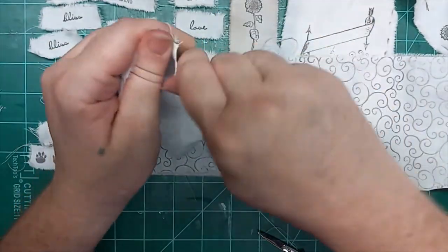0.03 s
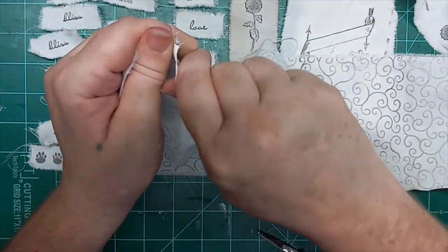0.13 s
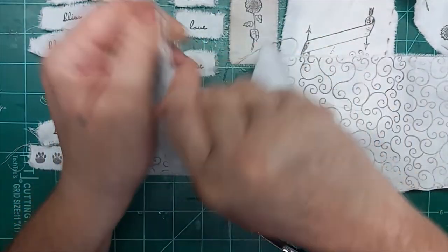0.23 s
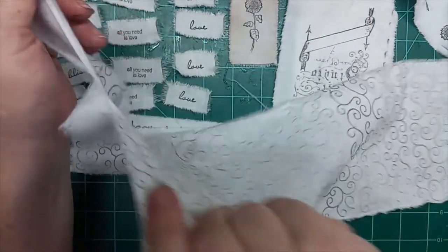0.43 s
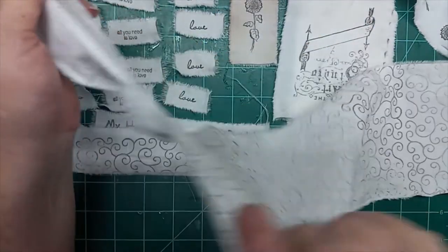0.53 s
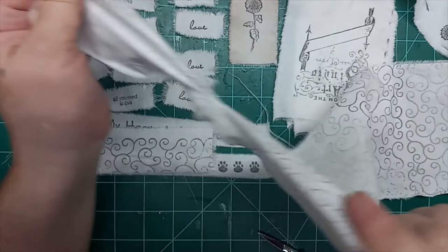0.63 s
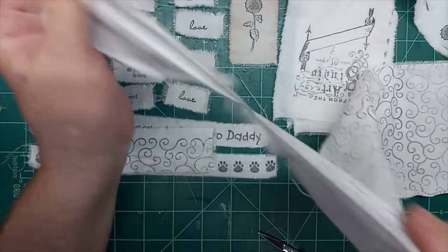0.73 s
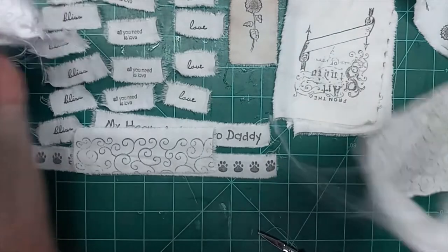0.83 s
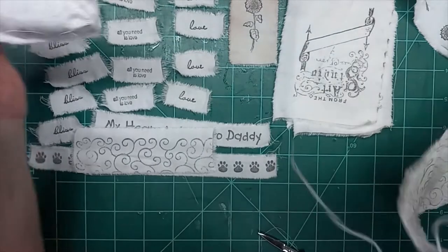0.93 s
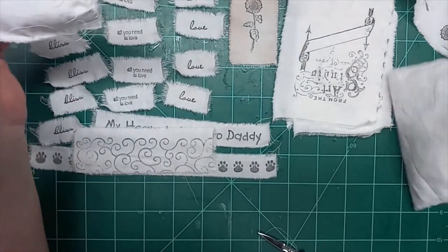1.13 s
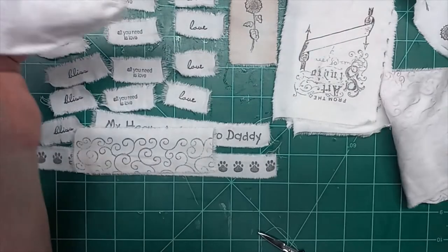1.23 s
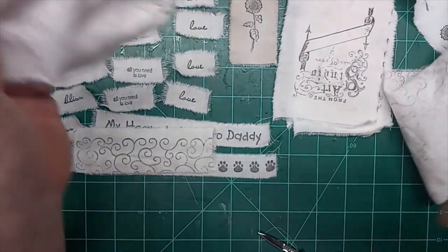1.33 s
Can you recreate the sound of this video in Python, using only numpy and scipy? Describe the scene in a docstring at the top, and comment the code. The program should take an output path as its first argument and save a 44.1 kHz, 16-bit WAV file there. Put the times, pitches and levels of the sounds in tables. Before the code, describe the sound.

Cloth is torn by hand, close up in a small quiet room. After a faint rustle of fingers, a long rip runs from about 0.2 to 0.6 seconds, bright and fast at first, then slower and lower. A short second rip comes at 0.7 seconds. The loose end swishes and cracks once around 0.8 seconds, and very faint finger brushes follow after 1 second.

```python
"""Two hands tear a strip of cotton over a cutting table in a small quiet room, close to the microphone.
Fingers grip the cloth; from 0.2 s threads snap one after another, fast and bright at first,
then slower while the freed cloth drums lower. At 0.73 s a short second pull parts the strip.
The loose end swishes through the air and cracks once; faint brushes of the fingers follow."""
import sys
import numpy as np
from scipy import signal
from scipy.fft import rfft, irfft, next_fast_len
from scipy.io import wavfile
from scipy.ndimage import uniform_filter1d, map_coordinates

SR = 44100
rng = np.random.default_rng(int(sys.argv[2]) if len(sys.argv) > 2 else 0)


def materialize(psi):
    """Save the field psi as 16-bit PCM at rate SR to the path in sys.argv[1].

    A 1-D psi becomes a single channel; in a 2-D psi each row is a channel.
    """
    bounded = np.clip(np.atleast_2d(psi).T, -1, 1)
    quanta = np.round(bounded * 32767).astype(np.int16)
    wavfile.write(sys.argv[1], SR, quanta)


N = 61739
T = np.arange(N) / SR


def amp(db):
    """Decibels to gain."""
    return 10 ** (np.asarray(db) / 20)


def unit_rms(x):
    """Scales to rms 1."""
    return x / np.sqrt(np.mean(x ** 2) + 1e-20)


def at_hz(points, hz):
    """Reads a table on a log-frequency axis."""
    f, value = np.transpose(points)
    return np.interp(np.log(hz + 1), np.log(f + 1), value)


def glide(table, column=1):
    """Follows one column over time, holding its end values."""
    rows = np.array(table)
    return np.interp(T, rows[:, 0], rows[:, column])


def fader(table, column=1):
    """Gain over time from one dB column; silent outside the table."""
    rows = np.array(table)
    return amp(np.interp(T, rows[:, 0], rows[:, column], left=-150, right=-150))


def pan(db):
    """Left and right gains for a pan in dB; positive is left."""
    gains = amp(np.array([db, -db]).reshape(2, -1) / 2)
    return gains / np.sqrt((gains ** 2).mean(0))


def delayed(x, seconds):
    """Delays a signal by a steady or moving time."""
    return map_coordinates(x, [(T - seconds) * SR], order=3)


def colour(x, points, resonances=()):
    """Minimum-phase EQ of unit energy: a colour shapes the tone and its dB are only relative."""
    hz = abs(np.fft.fftfreq(4096, 1 / SR))
    peaks_db = sum(lift * np.exp(-((hz - f) / width) ** 2) for f, width, lift in resonances)
    log_gain = np.log(amp(at_hz(points, hz) + peaks_db))
    taps = np.fft.ifft(np.exp(np.conj(signal.hilbert(log_gain)))).real[:2048]
    return signal.fftconvolve(x, taps[None] / np.linalg.norm(taps), axes=1)[:, :N]


def steady(x, window_s=.014):
    """Holds the short-time power at 1, keeping the single snaps."""
    window = np.exp(-(np.linspace(-.05, .05, 4411) / window_s * 2) ** 2)
    window_sum = window_s * SR * np.sqrt(np.pi) / 2
    power = signal.fftconvolve((x ** 2).mean(0), window, "same")
    return x / np.sqrt(abs(power) / window_sum + 1e-9)


def resonate(x, hz, width_hz):
    """A resonance that follows a moving frequency."""
    carrier = np.exp(2j * np.pi * np.cumsum(hz) / SR)
    r = np.exp(-np.pi * width_hz / SR)
    return (carrier * signal.lfilter([(1 - r) ** 2], [1, -2 * r, r * r], x / carrier)).real


# How alike the microphone's two ports sound. Each row: frequency in Hz, likeness from 0 to 1.
PORT_LIKENESS = [(50, .15), (130, 0.17), (290, 0.732), (620, .85), (1400, 0.33), (3500, 0.55), (8000, .35),
                 (16000, 0.14)]

def ports(three):
    """Mixes one shared and two separate signals into a stereo pair, more alike in the low middle."""
    size = next_fast_len(N)
    shared = at_hz(PORT_LIKENESS, np.fft.rfftfreq(size, 1 / SR))
    spectra = rfft(three, size)
    return irfft(np.sqrt(shared) * spectra[0] + np.sqrt(1 - shared) * spectra[1:], size)[:, :N]


def white():
    """White noise at both ports."""
    return ports(rng.standard_normal((3, N)))


def noise(points):
    """Coloured stereo noise of rms 1."""
    return unit_rms(colour(white(), points))


# Colour of the room tone. Each row: frequency in Hz, level in dB.
RUMBLE_COLOUR = [(20, -25), (48, -7), (70, -1), (117, -9), (175, -5), (230, -19), (340, -20), (650, -20),
                 (1200, -26.5), (2000, -33), (4000, -36), (12000, -35.5), (16000, -46)]

def room_tone(level_db=-65.5, shared=.55):
    """Faint low rumble of the room."""
    hiss = rng.standard_normal((3, N))
    stereo = np.sqrt(shared) * hiss[0] + np.sqrt(1 - shared) * hiss[1:]
    return amp(level_db) * unit_rms(colour(stereo, RUMBLE_COLOUR))


# The room's tail. Each row: frequency in Hz, seconds to fall 60 dB.
ROOM_T60 = [(150, .26), (700, .28), (1500, .21), (3000, .21), (6000, .23), (11000, .19), (16000, .15)]

def room(x, early_db=-9, early_t60_s=.1, tail_db=-18, build_s=.0019):
    """Adds quick reflections from nearby surfaces, then the short tail of the room."""
    early = white() * np.clip(T / build_s - .5, 0, 1) * amp(-60 * T / early_t60_s)
    hz, t, bands = signal.stft(white(), SR, nperseg=256)
    decay = amp(-60 * t / at_hz(ROOM_T60, hz)[:, None])
    tail = signal.istft(bands * decay, SR, nperseg=256)[1][:, :N]
    tail *= np.clip(T / build_s - 1, 0, 1)
    echoes = amp(tail_db) * tail / np.linalg.norm(tail[0])
    echoes += amp(early_db) * early / np.linalg.norm(early[0])
    return x + signal.fftconvolve(x, echoes[:, :SR // 2], axes=1)[:, :N]


# Where the tear sits between the ports. Each row: time in seconds, lag of the left port in ms.
PORT_LAG = [(.24, -0.06), (.3, 0.021), (.34, 0.048), (.42, 0.068), (.5, -0.064), (.58, -0.064),
            (.74, 0.054)]
# Bounces off hands and table. Each row: delay in seconds, gain.
BOUNCES = [(.00042, 0.081), (.0009, -0.53), (.0014, 0.062), (.0019, .18), (.0029, -0.022)]

def near_field(x, drift_s=.00012, drift_hz=2.6, spread_s=.00004):
    """The tear moves past the ports; bounces off hands and table sweep its colour."""
    lag_s = glide(PORT_LAG) / 1000
    left, right = delayed(x[0], lag_s / 2), delayed(x[1], -lag_s / 2)
    out = np.array([left, right])
    for (delay_s, gain), (phase, apart) in zip(BOUNCES, rng.random((len(BOUNCES), 2))):
        path_s = delay_s + drift_s * np.sin(2 * np.pi * (drift_hz * T + phase))
        offset_s = spread_s * (2 * apart - 1)
        out += gain * np.array([delayed(left, path_s + offset_s), delayed(right, path_s - offset_s)])
    return out


# Fingers brushing the cloth. Each row: start in seconds, length in seconds, level in dB.
BRUSHES = [(0.08, 0.065, -70), (0.166, 0.014, -66), (1.036, .01, -73.5), (1.21, 0.054, -73),
           (1.34, .06, -77)]
# Rustle of the grip, and air stirred by the pull. Each row: time in seconds, level in dB.
GRIP = [(0, -66.5), (.12, -70), (.2, -72)]
PULL_AIR = [(.19, -76), (.24, -62), (.3, -51), (.36, -65), (.44, -51.5), (.52, -52.5), (.58, -46),
            (.65, -80)]
# Hissy brush, dull grip, deep puff of air. Each row: frequency in Hz, level in dB.
BRUSH_COLOUR = [(100, -9.5), (1000, -4.5), (7000, -1), (16000, 0)]
GRIP_COLOUR = [(60, -7), (300, 4), (900, -3), (1550, 3), (2300, -14), (8000, -18), (16000, -27)]
AIR_COLOUR = [(20, -31), (50, -12), (90, 4.5), (150, -5), (240, -8), (500, -17), (2000, -50), (16000, -76)]

def hands():
    """The hands brush the cloth, grip it and stir the air as they pull."""
    strokes = sum(amp(db) * np.sin(np.pi * np.clip((T - start) / length, 0, 1) ** .6)
                  for start, length, db in BRUSHES)
    brushes = noise(BRUSH_COLOUR) * strokes
    grip = noise(GRIP_COLOUR) * fader(GRIP)
    return brushes + grip + noise(AIR_COLOUR) * fader(PULL_AIR)


def fray(clicks, burst_s=.0006, burst_db=1.5, tick_cutoff_hz=5500):
    """Each click becomes a tick and a quickly dying burst of breaking fibres, at both ports."""
    decay = np.exp(-2 / (burst_s * SR))
    burst = np.sqrt(signal.lfilter([1 - decay], [1, -decay], clicks ** 2) + 1e-20)
    pole = np.exp(-2 * np.pi * tick_cutoff_hz / SR)
    ticks = signal.lfilter([1 - pole], [1, -pole], clicks)
    return ports(amp(burst_db) * burst * rng.choice([-1., 1.], (3, N))) - ticks


def placed_snaps(cues):
    """One frayed, panned click per cue, its level taken over a millisecond."""
    out = np.zeros((2, N))
    for start, db, pan_db in cues:
        click = (np.arange(N) == round(start * SR)) * amp(db) * np.sqrt(SR / 1000)
        out += fray(click) * pan(pan_db)
    return out


# Resonances of the taut cloth above the table. Each row: centre in Hz, width in Hz, lift in dB.
CLOTH_RESONANCES = [(580, 110, -2), (1095, 110, 3), (1400, 110, -1.5), (1700, 130, 5), (1950, 90, -0.5),
                    (2274, 190, 4), (2480, 90, -6.5), (2760, 120, 0.5), (3030, 100, -2), (3537, 460, 0)]

def through_cloth(snaps, points):
    """Gives snaps a colour together with the cloth's resonances."""
    return colour(snaps, points, CLOTH_RESONANCES)


# The loose end flying past. Each row: time in seconds, swish in dB, pushed air in dB.
SWEEP = [(.745, -65, -68), (.772, -40.5, -51.5), (.797, -42.5, -49), (.812, -34.5, -55), (.826, -34, -70),
         (.844, -44, -50), (.856, -60, -55), (.9, -64, -70)]
# Two hits that fuse into one crack. Each row: start in seconds, relative level in dB, pan in dB.
CRACK_HITS = [(.8175, -19, 9), (.8188, -19, 2)]
# Soft swish and hard crack. Each row: frequency in Hz, level in dB.
SWISH_COLOUR = [(60, -15), (250, 11), (600, 3), (1000, -5), (2200, 0), (4000, -4), (8000, -5.5),
                (13000, -5), (16000, -5)]
CRACK_COLOUR = [(60, -8), (300, -2), (1100, -3), (2300, 3), (3300, 3), (5500, -9), (16000, -15)]

def loose_end(crack_db=-5.5, right_lag_s=.0003266):
    """The freed strip swishes, pushes air and cracks like a small flag."""
    left, right = through_cloth(placed_snaps(CRACK_HITS), CRACK_COLOUR)
    # It cracks far to the left, so the right port hears it later.
    crack = amp(crack_db) * np.array([left, delayed(right, right_lag_s)])
    swish = noise(SWISH_COLOUR) * fader(SWEEP) * pan(db=-2)
    return crack + swish + noise(AIR_COLOUR) * fader(SWEEP, column=2)


# Accents within the rips. Each row: start in seconds, relative level in dB, pan in dB.
STOUT_THREADS = [(.2022, -31, -4), (.2108, -31, -4), (.2268, -22, -4), (.2434, -17, -4), (.3608, -18, -3),
                 (.3822, -22, -2), (.4005, -22, -4), (.408, -21, -3), (.4157, -20, -1), (.4237, -22, -3),
                 (.4337, -19, -3), (.4622, -16, 2), (.4957, -20, 1), (.5222, -18, 1), (.5484, -23, 1),
                 (.5624, -19, 3), (.7373, -21, -4)]
# Bright snap and low drum of the cloth, also used by the rips. Each row: frequency in Hz, level in dB.
SNAP_COLOUR = [(60, -29.5), (300, -28), (600, -6.5), (1100, 0.5), (2200, -5), (3500, 4.5), (5500, 3),
               (8000, 3), (11000, 3.5), (14000, 4.5), (16000, -5)]
DRUM_COLOUR = [(30, -40), (100, -13.5), (190, -14.5), (300, -1), (430, -9.5), (600, -5.5), (820, -4),
               (1100, -1.5), (2000, -10), (5000, -30.5), (16000, -55.5)]

def stout_threads(tick_db=-4, body_db=-20):
    """Thicker threads hold a moment longer and break with a louder tick."""
    snaps = placed_snaps(STOUT_THREADS)
    return amp(tick_db) * through_cloth(snaps, SNAP_COLOUR) + amp(body_db) * colour(snaps, DRUM_COLOUR)


# Pace of the tear. Each row: time in seconds, threads per second.
TEAR_SPEED = [(.2, 300), (.235, 600), (.26, 1223), (.3, 1300), (.35, 780), (.395, 360), (.44, 650),
              (.47, 800), (.5, 550), (.55, 450), (.58, 733), (.74, 1325)]

def snapping_threads(gap_spread=.5, size_spread_db=3, rub_db=-7):
    """The tear runs through unevenly spaced, unevenly strong threads; loose fibres rub in between."""
    gap_draws, size_draws = rng.standard_normal((3000, 2)).T
    gaps = np.exp(gap_spread * gap_draws - gap_spread ** 2 / 2)
    sizes = amp(size_spread_db * np.clip(size_draws, -2, 1))
    threads_passed = np.cumsum(glide(TEAR_SPEED)) / SR
    break_samples = np.searchsorted(threads_passed, np.cumsum(gaps))
    clicks = np.bincount(break_samples, sizes, N + 1)[:N]
    snaps = steady(fray(clicks)) + amp(rub_db) * white()
    return snaps - uniform_filter1d(snaps, size=801, axis=1)  # trims the sub-bass


# The cloth's note. Each row: time in seconds, pitch in Hz.
CLOTH_NOTE = [(.24, 1190), (.295, 1010), (.33, 905), (.38, 751), (.44, 653), (.58, 640), (.74, 801.3)]

def drumming_cloth(snaps, note_db=-14.5):
    """Snaps pluck the taut cloth; its note sinks through the long rip as the freed part grows."""
    note = steady(resonate(snaps, glide(CLOTH_NOTE), width_hz=420))
    body = steady(colour(snaps, DRUM_COLOUR))
    return (body + amp(note_db) * note) / np.hypot(1, amp(note_db))


# The two pulls. Each row: time in seconds, snapping threads in dB, drumming cloth in dB, pan in dB.
LONG_RIP = [(.2, -43.5, -76, -3.5), (.224, -35.5, -59.5, -8.5), (.243, -24, -44.5, -6),
            (.254, -19, -43.5, -2), (.275, -17.5, -42, -5.5), (.293, -17.5, -33, -1),
            (.309, -17, -32, -0.5), (.337, -22.5, -30, 2), (.359, -21.5, -27, -3.5), (.398, -26, -37.5, -1),
            (.431, -22.5, -28, -4), (.47, -22, -32, 4.5), (.49, -24.5, -31, -4), (.529, -23, -30, 2.5),
            (.556, -34, -54, -0.5), (.577, -19, -29.5, 2), (.585, -39.5, -55, -21.5), (.61, -77, -76, -20)]
SHORT_RIP = [(.734, -46, -62, -1.14), (.738, -23.5, -49, -1.02), (.748, -28, -42.5, -1.17),
             (.762, -22, -40, 0.38), (.769, -34, -43, 0.48), (.785, -36, -49, 0)]
# Hoarse upper mids, peaking as the long pull starts and ends. Each row: time in seconds, level in dB.
RASP = [(.235, -54.5), (.265, -29.5), (.3, -29), (.35, -33), (.43, -35.5), (.5, -36), (.53, -26),
        (.556, -43), (.577, -25), (.59, -47)]
# Colours of the rasp and of the short pull's snaps. Each row: frequency in Hz, level in dB.
RASP_COLOUR = [(200, -34.5), (1000, -9), (1700, -6), (2300, -2.5), (3300, 1), (4300, -8.5), (9000, -27.5),
               (16000, -41.5)]
SHORT_SNAP_COLOUR = [(60, -52), (300, -20.5), (700, -1), (1300, -4), (1800, -3), (3000, -0.5), (5000, -2.5),
                     (8000, -4.5), (11500, -1), (14000, -3), (16000, -4)]

def rips():
    """A long pull, then a short one: one stream of snaps ticks, rasps and drums the cloth."""
    snaps = snapping_threads()
    drum = drumming_cloth(snaps)
    out = steady(through_cloth(snaps, RASP_COLOUR)) * fader(RASP)
    for pull, snap_colour in (LONG_RIP, SNAP_COLOUR), (SHORT_RIP, SHORT_SNAP_COLOUR):
        threads = steady(through_cloth(snaps, snap_colour)) * pan(glide(pull, column=3))
        out += threads * fader(pull) + drum * fader(pull, column=2)
    return out


def scene():
    """Both rips, the loose end and the handling, in the room."""
    tear = near_field(rips() + stout_threads())
    return room(tear + loose_end() + hands()) + room_tone()


# Tone of the left port against the right. Each row: frequency in Hz, left minus right in dB.
PORT_TILT = [(300, -1), (1400, 2.5), (3000, 1), (5400, 1.5), (7300, -9.5), (8700, 3.5), (10000, -5.5),
             (12200, -1.5), (16000, 2.5)]

def record(dry, cutoff_hz=16000):
    """Each port adds its own colour, then a low-pass cuts the very top."""
    tilt = pan(at_hz(PORT_TILT, np.fft.rfftfreq(N, 1 / SR)))
    heard = irfft(rfft(dry) * tilt, N)
    lowpass = signal.firwin(401, cutoff_hz, window=("kaiser", 9), fs=SR)
    return signal.oaconvolve(heard, lowpass[None], "same")


dry = scene()
out = record(dry)
materialize(out)
```